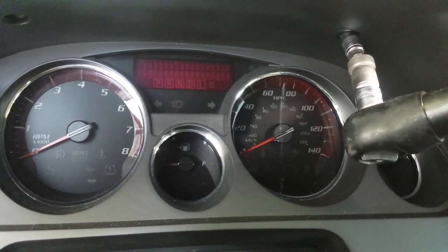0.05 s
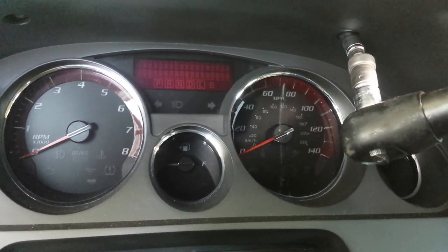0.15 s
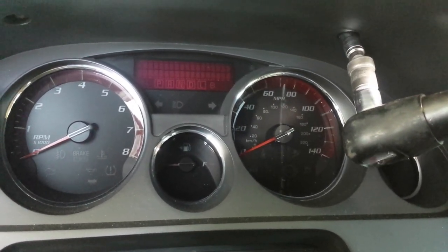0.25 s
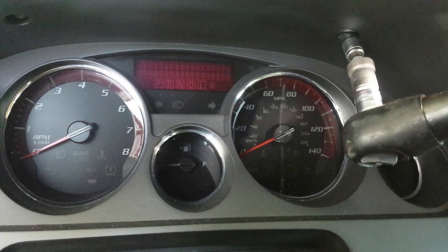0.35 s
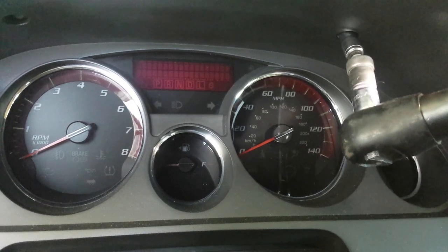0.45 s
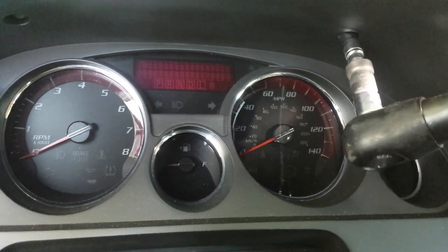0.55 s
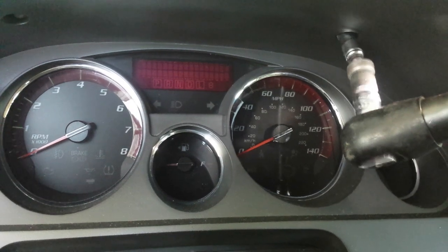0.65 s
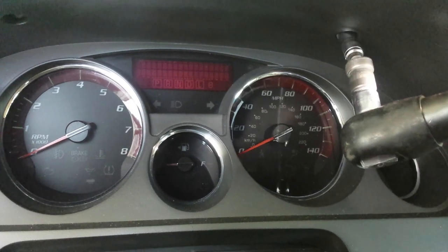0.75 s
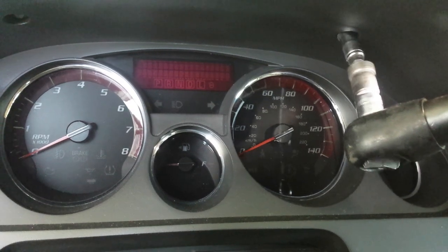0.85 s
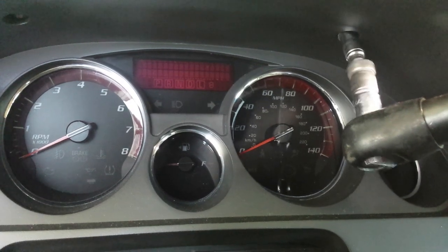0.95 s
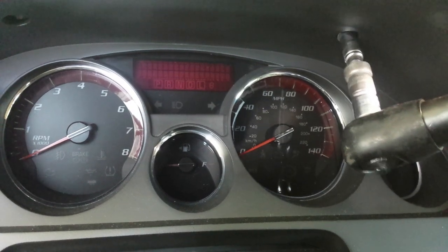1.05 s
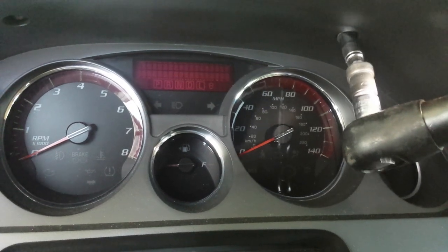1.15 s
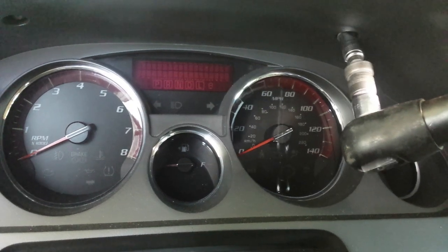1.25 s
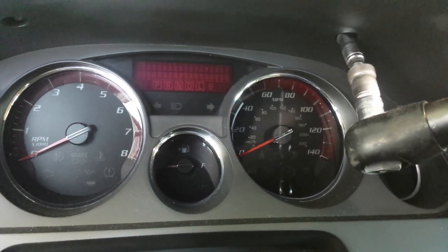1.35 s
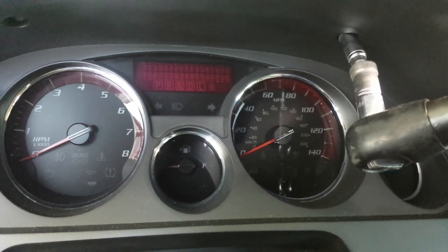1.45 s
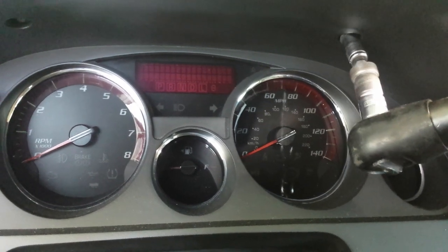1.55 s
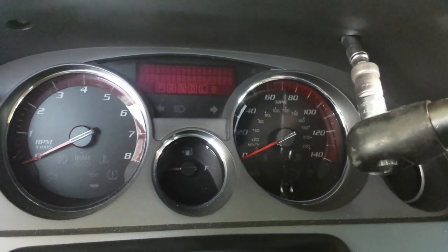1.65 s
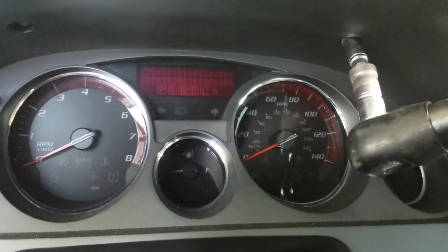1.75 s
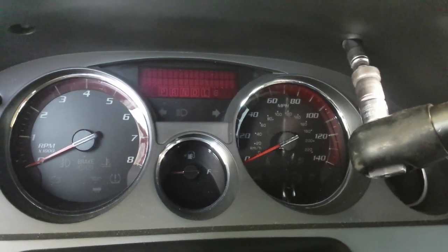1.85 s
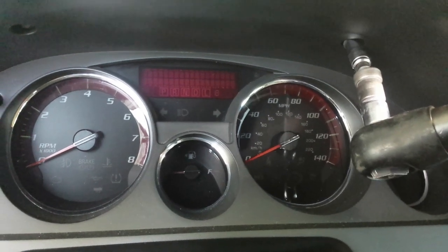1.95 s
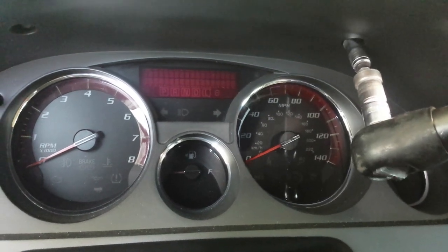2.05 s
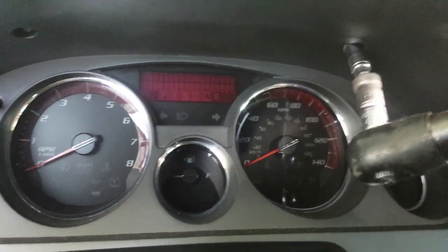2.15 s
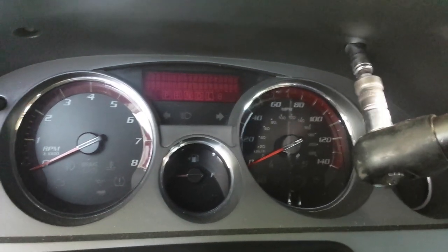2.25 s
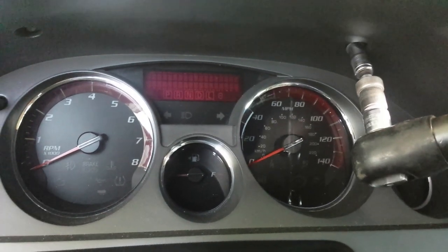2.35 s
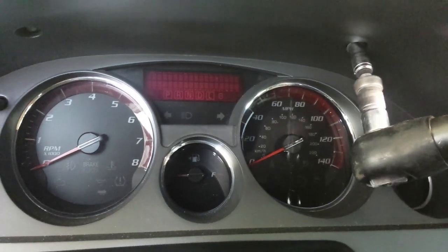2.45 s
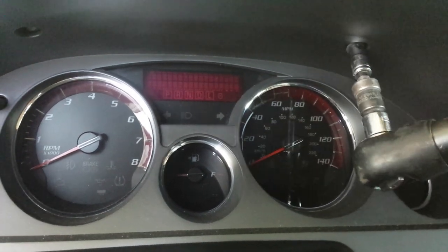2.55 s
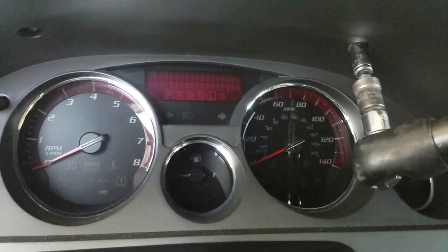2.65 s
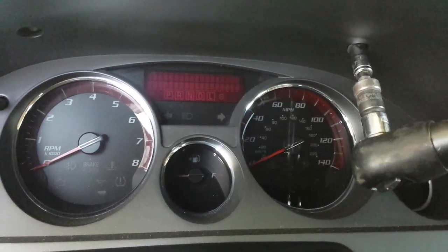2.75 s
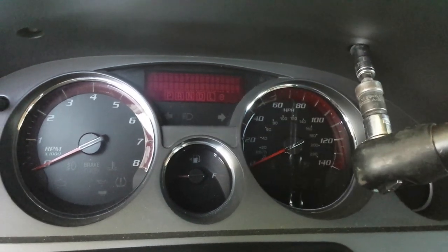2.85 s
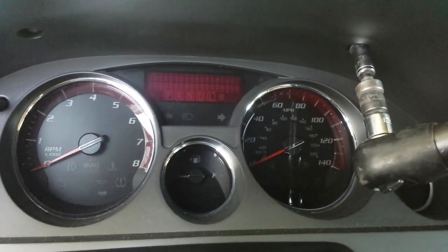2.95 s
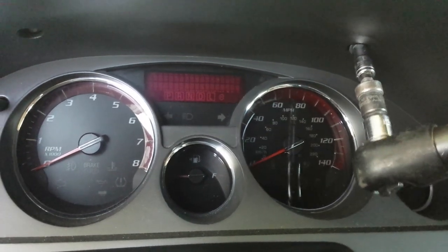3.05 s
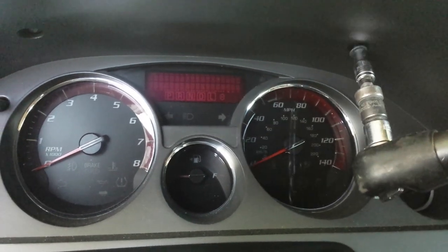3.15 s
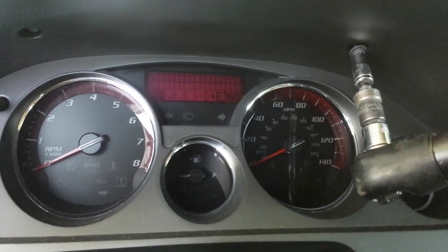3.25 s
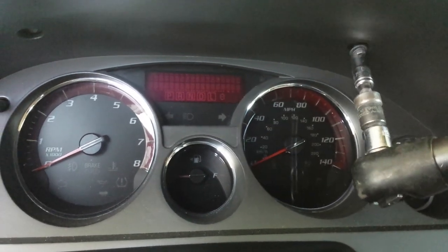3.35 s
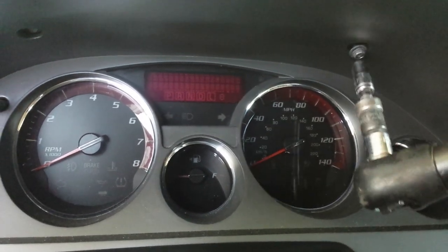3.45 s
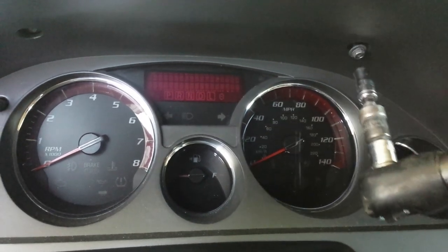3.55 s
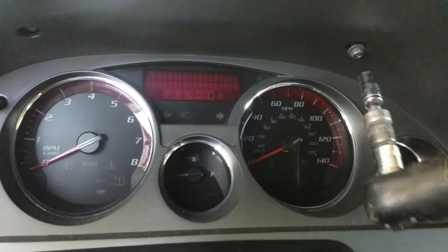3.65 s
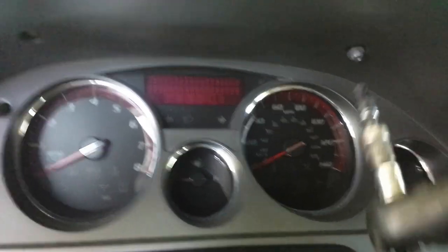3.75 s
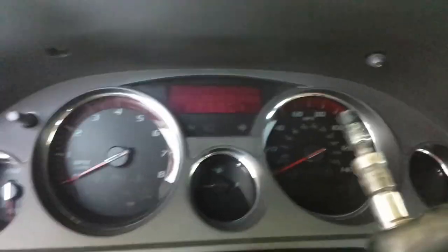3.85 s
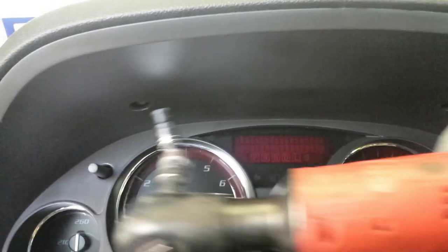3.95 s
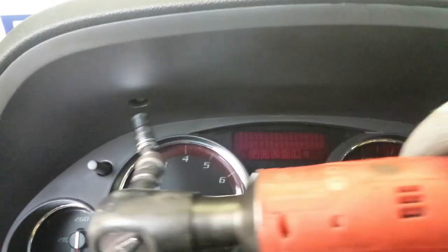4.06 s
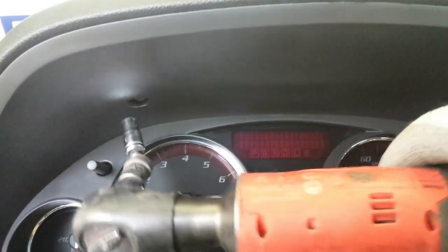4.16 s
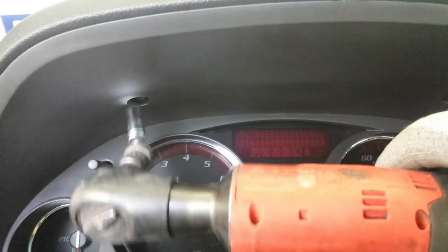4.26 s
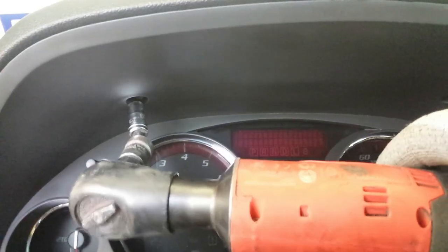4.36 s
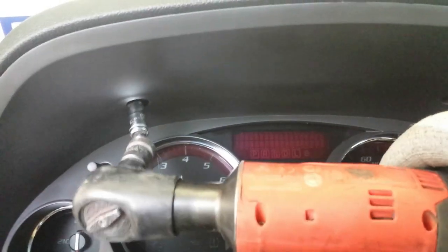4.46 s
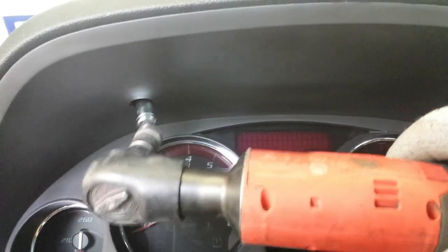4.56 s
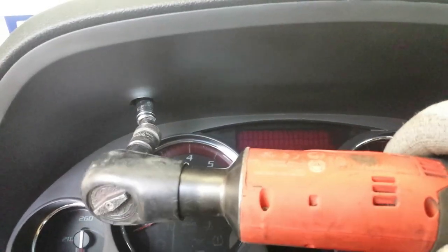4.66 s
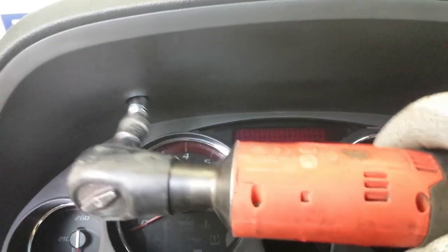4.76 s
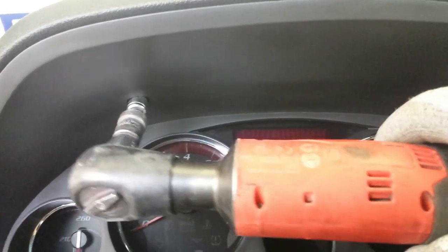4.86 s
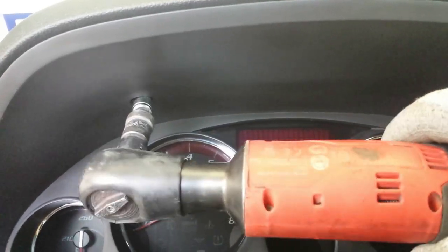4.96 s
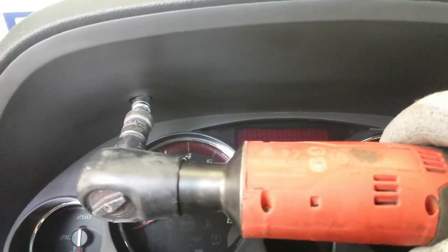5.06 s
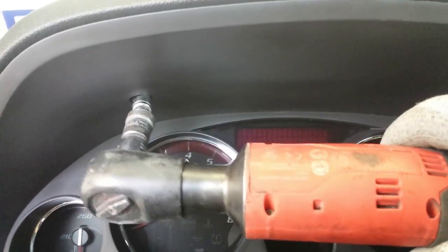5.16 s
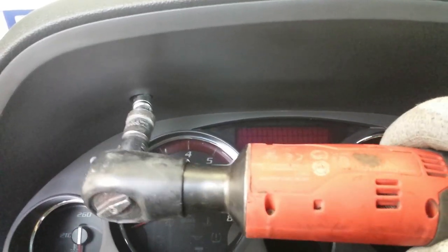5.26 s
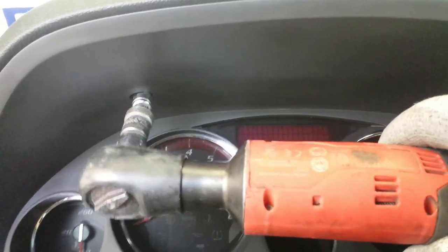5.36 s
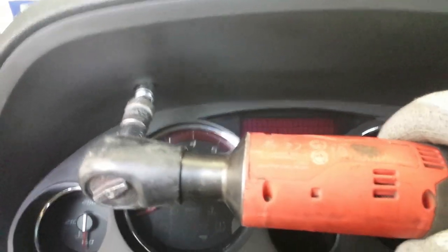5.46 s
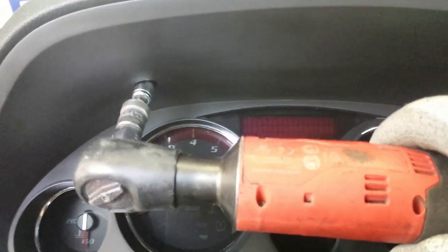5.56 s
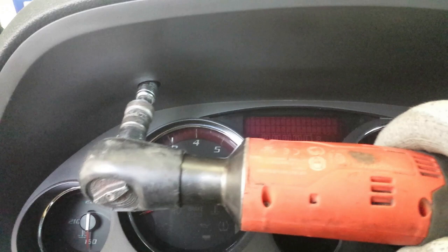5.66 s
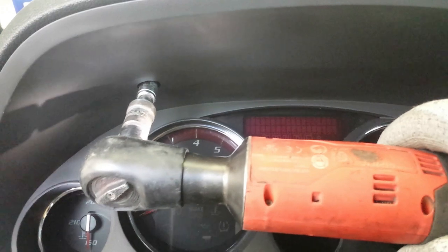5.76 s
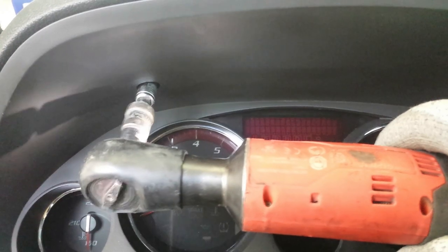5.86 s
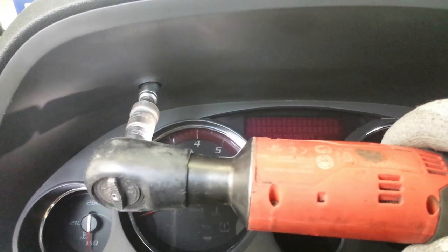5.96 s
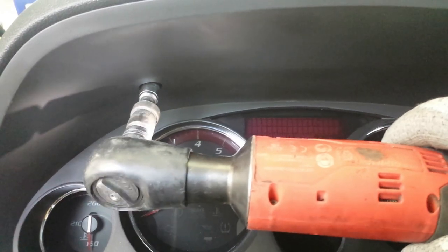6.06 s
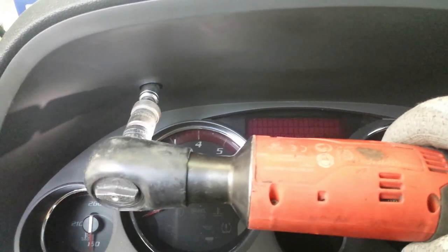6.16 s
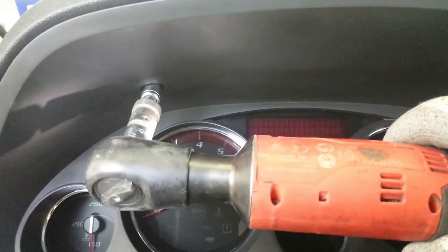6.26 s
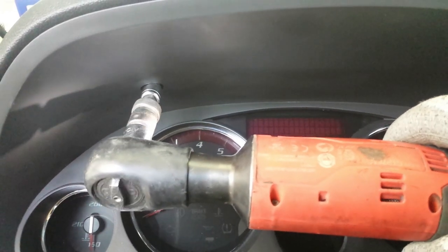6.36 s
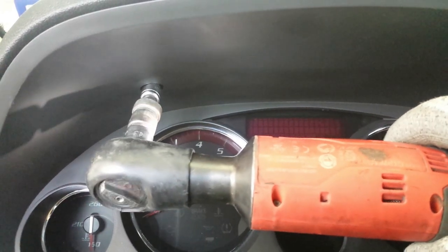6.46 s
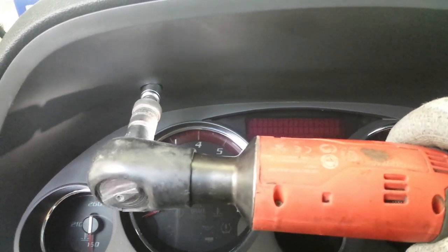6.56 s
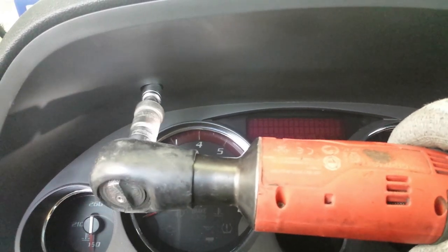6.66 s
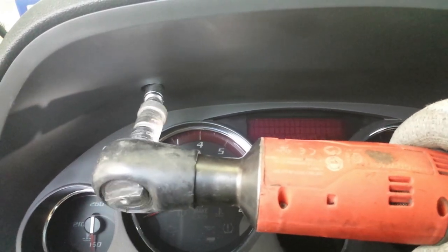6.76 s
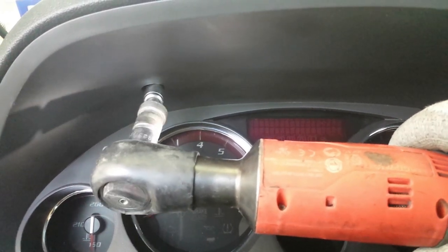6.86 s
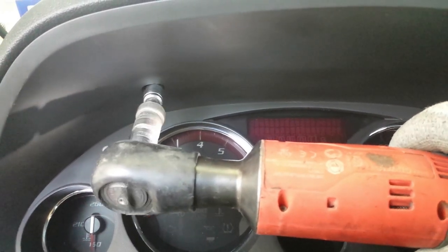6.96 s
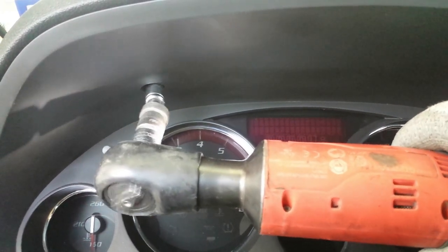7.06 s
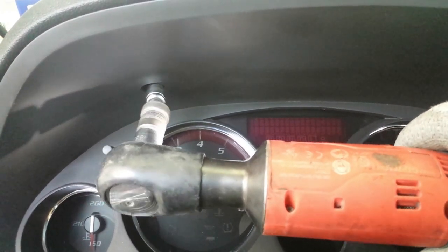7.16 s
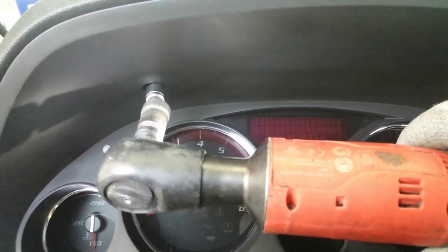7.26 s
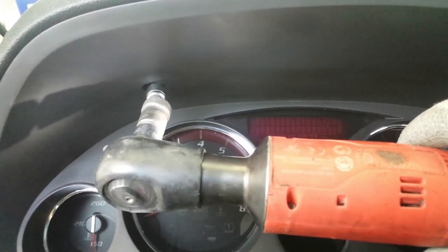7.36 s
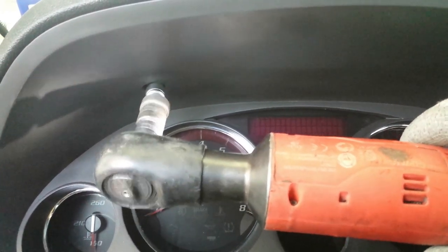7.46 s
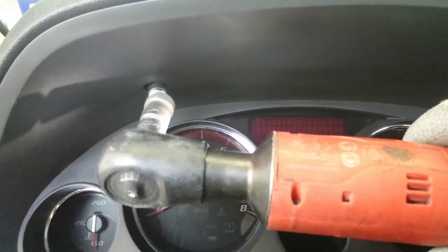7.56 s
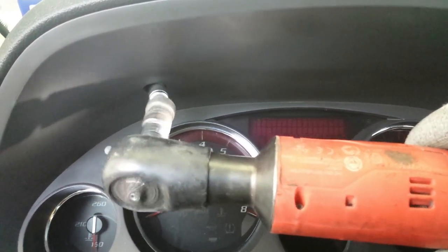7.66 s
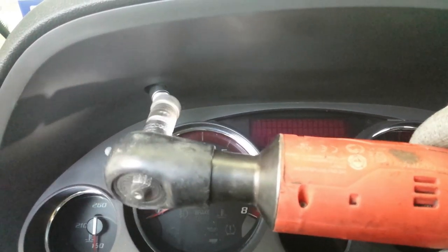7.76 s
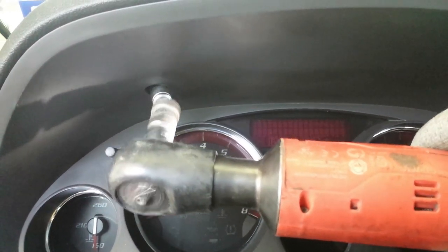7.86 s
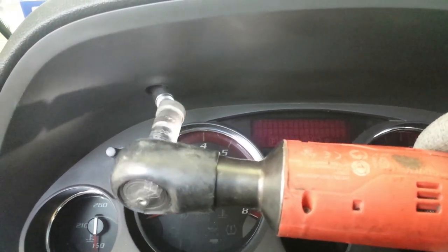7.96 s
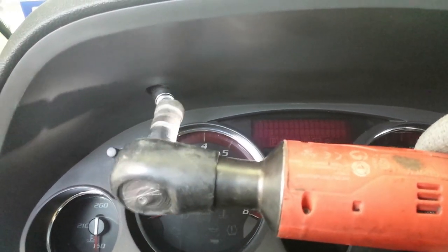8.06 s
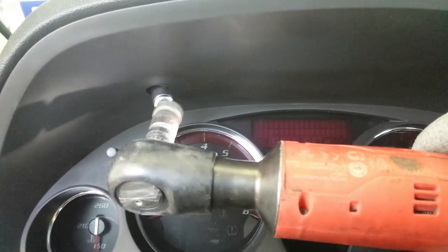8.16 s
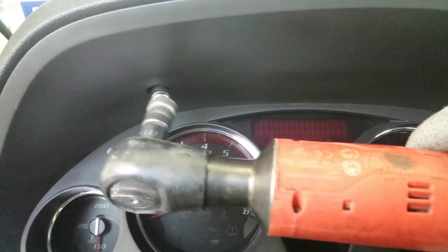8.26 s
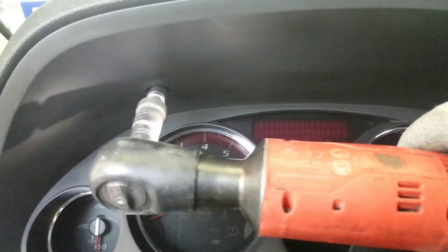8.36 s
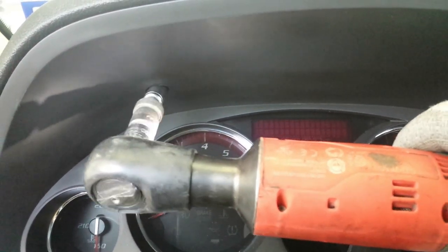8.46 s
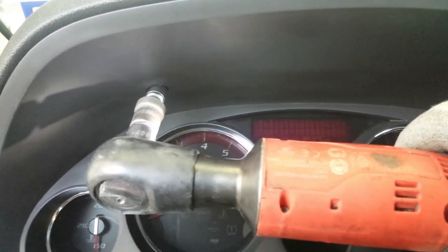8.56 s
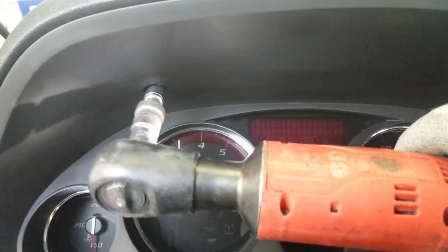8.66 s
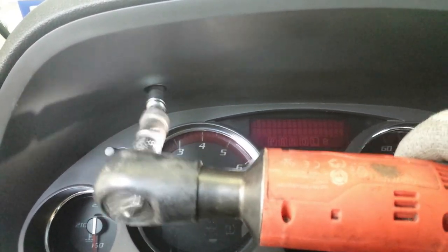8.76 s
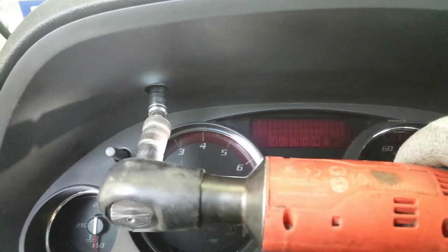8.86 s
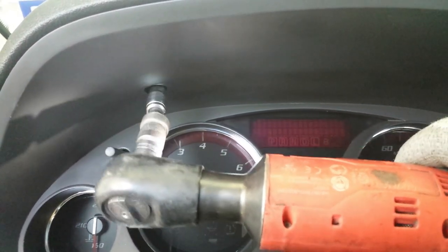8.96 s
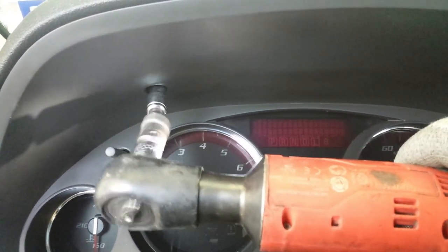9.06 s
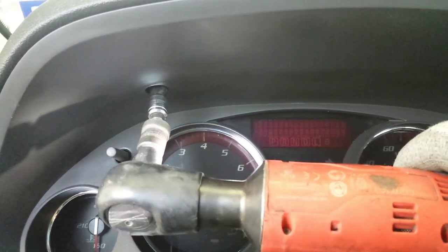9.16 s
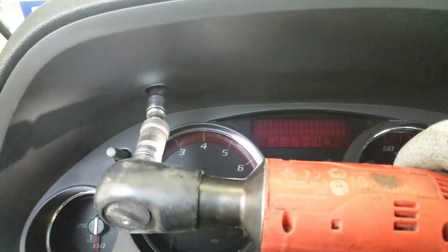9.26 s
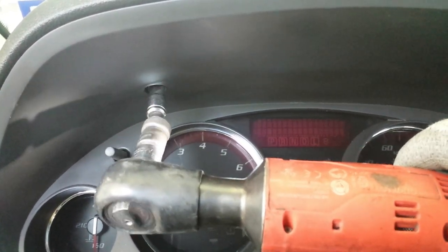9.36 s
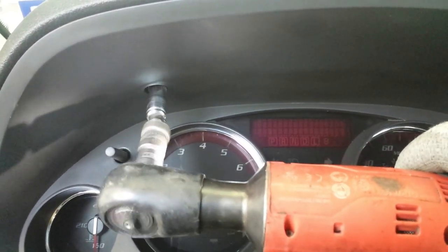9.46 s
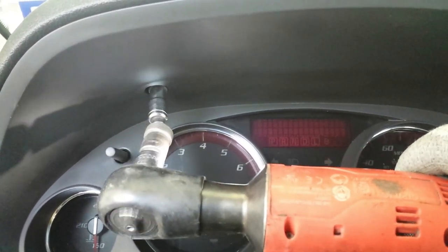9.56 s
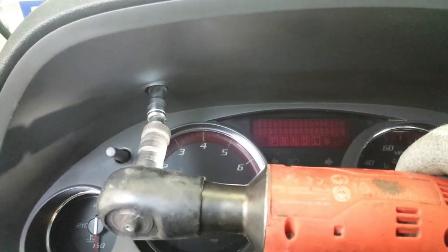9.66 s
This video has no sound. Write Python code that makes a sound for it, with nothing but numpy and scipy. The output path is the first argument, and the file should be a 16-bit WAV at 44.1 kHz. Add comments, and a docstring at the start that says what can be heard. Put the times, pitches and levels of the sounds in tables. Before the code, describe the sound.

From the start a cordless ratchet runs very close, a dense metallic whir of pawl clacks, gear rattle and low buzz, rising slightly in speed by 0.8 s and holding steady, with soft air thumps on the right. At about 2.7 s it coasts down in a few clacks and stops. Quiet cabin rumble and hiss remain, with faint steel ticks and squeaks until 3.4 s. Around 3.95 s handling rumble swells with a bright scrape and chirp; a soft pop and knock come near 4.4 s, strong socket clinks at 4.7 s, then scrapes, knocks and small ticks to 5.9 s. A thin whine flickers at 5.9 s and the ratchet strains in separate rapid clacks from 6 s, blurring into a whir near 6.9 s. It is fastest around 8 s, sags at 8.55 s, recovers and surges again by 9.7 s. Dry, padded small space.

```python
"""A cordless ratchet backs two screws out of a dashboard hood, close to the right microphone port.
Every crank turn the pawl clacks over the teeth in a fixed pattern: filtered noise bursts that ring the head.
Meshing gears rattle as random noise grains, the crank buzzes once a turn, fan eddies slap the right port.
Between the screws decaying modes make the socket's steel ring and the hood's knocks, among scrapes and squeaks.
Rumble, air, hiss and hums of a quiet cabin lie beneath; a short diffuse tail surrounds tool and touches."""
import sys
import numpy as np
from scipy import signal
from scipy.fft import rfft, irfft
from scipy.io import wavfile
from scipy.ndimage import uniform_filter1d

SR = 44100
rng = np.random.default_rng(int(sys.argv[2]) if len(sys.argv) > 2 else 0)


def pcm_store(signal):
    """Save signal as 16-bit PCM."""
    levels = np.round(np.clip(np.atleast_2d(signal), -1, 1) * 32767)
    wavfile.write(sys.argv[1], SR, levels.astype(np.int16).T)


N = 428211

# crank speed while each screw turns: time_s, speed (turns per s)
FIRST_SPEED = [(0, 67.69), (0.45, 68.75), (0.8, 84.91), (1.2, 86.89), (1.8, 86.23), (2.1, 85.29),
               (2.55, 85.84), (2.76, 77.3)]
SECOND_SPEED = [(6, 10.08), (6.1, 22.19), (6.3, 25.19), (6.6, 28.34), (7.1, 76.65), (7.3, 81.81),
                (7.5, 84.22), (7.7, 98.41), (8.2, 99.95), (8.35, 92.08), (8.55, 61.82), (8.75, 71.92),
                (9, 74.23), (9.3, 72.09), (9.45, 77.84), (9.62, 97.76), (9.71, 99.32)]
# left port against right, one curve a screw: pitch_hz, balance_db
TOOL_BALANCE = [
    [(60, -11.5), (110, -8), (200, 5), (380, -8.5), (700, -3), (1290, -6), (2380, -6.5), (4400, -3.5),
     (8120, -15), (15000, -12.5)],
    [(60, -7), (110, -14), (200, -8.5), (380, -6.5), (700, -9.5), (1290, -7.5), (2380, -8), (4400, 0),
     (8120, -14.5), (15000, -15)],
]
TOOL_LIKENESS = 0.23   # of the tool's noise at the two ports, 0-1
USUAL_SPEED = 85   # turns per s
RELEASE_S = 2.7   # the first screw ends as the trigger is let go
SQUEEZED_S = 5.958   # the trigger reaches full gain for the second screw


def amp(db):
    """Decibels to linear gain."""
    return 10 ** (np.asarray(db) / 20)


def rms_one(x):
    """Scales a signal to rms 1."""
    return x / np.sqrt(np.mean(x ** 2) + 1e-20)


def mid_one(x):
    """Scales a pair so that its mean has rms 1."""
    return x / np.sqrt(np.mean(x.mean(axis=0) ** 2))


def in_time(rows, outside=None):
    """Columns of a curve table, sample by sample."""
    s, *columns = np.transpose(rows)
    return [np.interp(np.arange(N) / SR, s, c, outside, outside) for c in columns]


def impulses(rows):
    """A click for each (time_s, level_db) row."""
    s, db = np.transpose(rows)
    return np.bincount(np.round(s * SR).astype(int), amp(db), N)


def die(clicks, t60):
    """Each click becomes an exponential envelope, 60 dB down after t60 seconds."""
    return signal.lfilter([1], [1, -amp(-60 / (t60 * SR))], clicks + 1e-18)


def drift(rate):
    """Slow chance of rms 1: low-passed noise near a rate in Hz, drawn at every 16th sample."""
    r = np.exp(-32 * np.pi * rate / SR)
    noise = rng.standard_normal(N // 16 + 2002)
    slow = signal.lfilter([1], [1, -2 * r, r * r], noise)[2000:]
    return np.interp(np.arange(N) / 16, np.arange(len(slow)), rms_one(slow))


def pair(alike):
    """Two noises with a given likeness, from a shared middle and an opposed side."""
    mid, side = rng.standard_normal((2, N))
    alike = np.clip(alike, 0, 1)
    return np.sqrt(1 + alike) * mid + np.sqrt(1 - alike) * side * [[1], [-1]]


def colour(x, spectrum, lifts=(), tilt=None, share=0):
    """Causal (minimum-phase) filter from a spectrum, resonant lifts and a share of a left-right tilt."""
    hz = np.maximum(np.fft.rfftfreq(4096, 1 / SR), 1)

    def read(points):
        point_hz, point_db = np.array(points).T
        return np.interp(np.log(hz), np.log(point_hz), point_db)

    db = read(spectrum) + sum(lift / (1 + (2 * (hz - f) / w) ** 2) for f, w, lift in lifts)
    db = db + (share * read(tilt) if tilt else 0)
    # folding the cepstrum forward makes the filter causal
    cepstrum = irfft(db * np.log(10) / 20)
    cepstrum[1:2048] *= 2
    cepstrum[2049:] = 0
    return signal.oaconvolve(x, irfft(np.exp(rfft(cepstrum))))[:len(x)]


def at_ports(noise, spectrum, lifts, tilt):
    """The tool heard at both ports; the left one lies in the shadow."""
    left = colour(noise[0], spectrum, lifts, tilt, share=0.97)
    return np.array([left, colour(noise[1], spectrum, lifts)])


def flicker(x, patchy_db, rate, count=17):
    """Loose parts rattle on and off: bands 0.4 octave wide swell and sink on their own, the treble least."""
    out, edges = x.copy(), 130 * 2 ** (.4 * np.arange(count))
    for low, high in zip(edges, edges[1:]):
        band = signal.sosfilt(signal.butter(2, [low, high], "band", fs=SR, output="sos"), x)
        swell_db = patchy_db * (low / 1000) ** -.4 * drift(rate)
        out += (amp(swell_db) - 1) * band
    return out


def head(order):
    """Resonances of the ratchet head as one excitation meets them: 0 rattle and ticks, 1 driving, 2 returning."""
    # pitch_hz, width_hz, rattle_and_ticks_db, driving_clacks_db, returning_clacks_db (lifts)
    resonances = [(525, 76, 4.5, 0.5, 1), (704, 78, 5.5, 3, -1.5), (1240, 140, 5.5, 0.5, 2.5),
                  (3810, 110, 2.5, -1, 2), (4955, 150, 4, -1.5, 0.5), (5614, 95, 2, -3.5, 6.5),
                  (6360, 640, 2.5, 0.5, 7.5), (7255, 300, 3.5, 4.5, 5), (8100, 330, -1, 3.5, -7),
                  (8550, 170, 2.5, 6.5, -9), (8990, 370, -8.5, 6, -9), (10190, 460, -2, 6.5, -6.5),
                  (12000, 2200, 1, -3.5, -1)]
    return [(row[0], row[1], row[2 + order]) for row in resonances]


def trigger(k):
    """Gain in dB as the motor coasts down, then is braked (first screw), or is squeezed on (second)."""
    coast_db_per_s, brake_s, brake_db_per_s, rise_db_per_s = 214, 2.755, 1500, 900
    t = np.arange(N) / SR
    release = -coast_db_per_s * (t - RELEASE_S) - brake_db_per_s * np.maximum(t - brake_s, 0)
    squeeze = rise_db_per_s * (t - SQUEEZED_S)
    return np.clip([release, squeeze][k], -120, 0)


def pawl_envelope(turns, speed):
    """Every turn plays the contact table; each clack comes a little early or late, harder or softer."""
    # contacts in one crank turn: angle (turns), slow_db, fast_db, share that rings high (0-1)
    contacts = [(.05, -9.5, 1, 0), (.17, -7, -2, 0.04), (0.399, -18.5, -5.5, 0.4), (.552, -19, -3, 0.1),
                (.74, -6, 0.5, .9), (.84, -3.5, -6.5, 0.8), (0.941, -2.5, -6, 0.7)]
    # returning clacks over driving clacks: time_s, level_db
    return_curve = [(0, 2.5), (.6, -3), (2.7, -1.5), (6.7, -0.5), (7.2, -2), (8, 0), (8.6, -4.5), (9, 1),
                    (9.7, 3.5)]
    slow_speed, fast_speed = 10, 93   # turns per s
    t60_s, spread_db, jitter_turns = 0.013, 1.5, 0.027
    angle, slow_db, fast_db, high = np.transpose(contacts)
    whole = np.arange(0, turns[-1])[:, None]
    luck = rng.standard_normal((len(whole), 2, len(angle)))
    at = np.searchsorted(turns, whole + angle + jitter_turns * luck[:, 0])
    fast = np.clip((speed[np.minimum(at, N - 1)] - slow_speed) / (fast_speed - slow_speed), 0, 1)
    size = amp(slow_db + fast * (fast_db - slow_db) + spread_db * luck[:, 1])
    inside = (at > 0) & (at < N)
    high = np.clip(high, 0, 1)
    lean = in_time(return_curve)[0] / 2
    clicks = [np.bincount(at[inside], (size * np.sqrt(share))[inside], N) for share in (high, 1 - high)]
    envelope = die(uniform_filter1d(clicks, size=30), t60_s) * amp([-lean, lean])   # driving, returning
    # local power is levelled, so that effort alone sets the loudness
    power = uniform_filter1d(np.sum(envelope ** 2, axis=0), size=SR // 8)
    return envelope / np.sqrt(power + 1e-7)


def ratchet(k, speed_rows):
    """One screw: pawl clacks, gear rattle and crank buzz, all louder with speed."""
    # crank angle as each speed table begins (turns)
    start_turns = [.31, .91]
    # colours of clacks, rattle and the crank's push through head and hood, by screw: pitch_hz, gain_db
    pawl_colour = [
        [(880, -38.5), (1500, -20), (2450, -21.5), (2700, -15.5), (3150, -20.5), (5000, -7), (5840, -9.5),
         (8100, 3), (9090, -6), (10400, -3.5), (11500, -13.5), (13100, -15.5), (15000, -36.5)],
        [(880, -51.5), (1500, -16), (2080, -26.5), (2310, -10.5), (2700, -32.5), (2970, -12), (3400, -21),
         (5450, -5.5), (5950, -9.5), (7210, -1.5), (8330, 1.5), (13900, -17.5), (14500, -25), (15000, -38)],
    ]
    gears_colour = [
        [(180, -54), (300, -30.5), (383, -23.5), (691, -22.5), (830, -19.5), (930, -26.5), (1030, -15.5),
         (1250, -16.5), (2250, -14), (2480, -21.5), (2730, -14), (8190, -7.5), (13200, -21), (13800, -26),
         (15000, -72.5)],
        [(180, -41.5), (300, -13), (383, -17), (587, -12), (913, -11.5), (1270, -10), (1760, -10),
         (2320, -11.5), (2560, -10), (8320, -4), (13200, -32), (14300, -26), (15000, -32)],
    ]
    buzz_colour = [
        [(60, -33.5), (100, -17.5), (180, 4), (260, 2.5), (400, -11.5), (650, 9), (900, -15.5), (1300, -7),
         (2200, -6.5), (3500, -26.5)],
        [(60, -11), (100, -37), (180, -5), (260, -9.5), (400, -13.5), (650, 5.5), (900, 4.5), (1300, -4.5),
         (2200, -11), (3500, -23)],
    ]
    # level laws, one row a screw: relative level_db at the usual speed, slope (dB per turn per s)
    pawl_law = [(-17, 0.1), (-16, 0.1033)]
    gears_law = [(-24, 0.21), (-23.5, 0.17)]
    buzz_law = [(-34, 0.38), (-39, 0.064)]
    # left port after right, by screw: lag_s
    port_lag = [-.00023, 0.0]
    blur_s = 6.87   # single strokes of the second screw run together from here
    lurch_db, lurch_s = 8.5, 0.1   # the gears strain as the second screw breaks loose
    mesh_per_s, mesh_spread_db = 4000, 1.5   # gear teeth meeting

    speed, = in_time(speed_rows, outside=0)
    turns = start_turns[k] + np.cumsum(speed) / SR
    t = np.arange(N) / SR
    excess = in_time(speed_rows)[0] - USUAL_SPEED
    pawl_db, gears_db, buzz_db = [law[k][0] + law[k][1] * excess + trigger(k)
                                  for law in (pawl_law, gears_law, buzz_law)]

    blurred = (t > blur_s) if k else (t < RELEASE_S)
    clacks = sum(at_ports(envelope * pair(TOOL_LIKENESS), pawl_colour[k], head(order=j + 1), TOOL_BALANCE[k])
                 for j, envelope in enumerate(pawl_envelope(turns, speed)))
    pawl = blurred * amp(pawl_db - 4.0) * mid_one(clacks)

    # teeth chatter, harder on the drive stroke
    gears_db = gears_db + k * lurch_db * np.exp(-np.maximum(t - SQUEEZED_S, 0) / lurch_s)
    meet = rng.random(N) < mesh_per_s / SR
    chance_db = mesh_spread_db * np.minimum(rng.exponential(1, N), 4) + 0.45 * drift(170)
    rattle = meet * amp(chance_db + 0.3 * np.cos(2 * np.pi * turns))
    rattle = at_ports(rattle * pair(TOOL_LIKENESS), gears_colour[k], head(order=0), TOOL_BALANCE[k])
    gears = amp(gears_db) * mid_one(rattle)

    # one push a turn, levelled; its lines break up and waver
    pushes = np.diff(np.floor(turns + 0.013 * drift(25)), prepend=0) * amp(0.97 * drift(40))
    buzz = colour(pushes, buzz_colour[k])
    buzz = amp(buzz_db - 7.5) * buzz / np.sqrt(uniform_filter1d(buzz ** 2, size=SR // 8) + 1e-12)
    buzz = flicker(buzz, 2.5, 6.0, count=8)

    left, right = pawl + gears + buzz * amp([[-1.5], [1.5]])
    return np.array([np.roll(left, round(port_lag[k] * SR)), right])


def room(x):
    """Short diffuse tail of a padded cabin: decaying noise, own echoes for each port."""
    t60_s = 0.22
    since = np.arange(int(.5 * SR)) / SR
    echoes = rng.standard_normal((2, len(since))) * amp(-60 * since / t60_s) * (since > .004)
    echoes = echoes / np.sqrt(np.sum(echoes ** 2, axis=1, keepdims=True))
    return signal.oaconvolve(x, echoes, axes=1)[:, :N]


def cabin():
    """Low rumble, hums, air and hiss; rumble, hums and hiss change when the microphone is moved."""
    # relative levels, swelling while the hands move: time_s, rumble_db, air_db
    swells = [(2.78, -58, -56), (2.9, -51, -70.5), (3.4, -60, -71.5), (3.75, -55, -68), (3.97, -41, -54.5),
              (4.15, -45, -53), (4.65, -41.5, -49), (4.9, -43, -40), (5.12, -49, -57.5), (5.4, -56, -57),
              (5.85, -46.5, -55.5), (6.05, -60, -41.5)]
    # rumble colours before and after the move: pitch_hz, gain_db
    rumble_colours = [
        [(15, -65), (25, -39), (48, -23.5), (60, -7.5), (76, 4.5), (93, -0.5), (108, -34), (180, -34.5),
         (230, -65), (400, -120)],
        [(15, -31), (25, -10), (70, 5), (99, 5), (139, -12), (180, -2), (230, -66), (400, -120)],
    ]
    # air and hiss colours: pitch_hz, gain_db
    air_colour = [(71, -33), (120, -8.5), (194, -6), (241, -9), (300, -15.5), (531, -15.5), (595, -15),
                  (1120, -14.5), (2500, -47.5), (3250, -65), (5500, -120)]
    hiss_colour = [(940, -25), (1600, 0.5), (1770, -4), (3230, -6), (3790, -5.5), (5500, -7.5), (7030, -6),
                   (7640, -2.5), (7940, -6.5), (13900, -16), (15000, -11)]
    # resonance of the air: pitch_hz, width_hz, lift_db
    air_ring = [(513, 33, 6)]
    # steady hums: pitch_hz, before_db, after_db
    hums = [(48, -80, -56), (80, -56, -55), (100, -80, -60), (188, -80, -62)]
    # thin steady whines: pitch_hz, level_db over the hiss
    whines = [(7472, -12.5), (8695, -19.5), (13655, -27)]
    move_s, move_length_s = 3.9, 0.065
    # hiss level at air of -54 dB, share of the air's swing it follows, gain after the move
    hiss_base_db, hiss_follows, hiss_moved_db = -65.5, 0.48, 7

    rumble_db, air_db = in_time(swells)
    moved = np.clip((np.arange(N) / SR - move_s) / move_length_s, 0, 1)
    hiss_db = hiss_base_db + hiss_follows * (air_db + 54.0) + hiss_moved_db * moved

    def noise(sides, *shape):
        return rms_one(np.array([colour(side, *shape) for side in sides]))

    def tone(hz):
        return np.sin(2 * np.pi * hz * np.arange(N) / SR) * amp(1.484 * drift(3))

    low = pair(0.47)
    before, after = [noise(low, spectrum) for spectrum in rumble_colours]
    rumble = amp(rumble_db - 3) * ((1 - moved) * before + moved * after)
    rumble = rumble + sum(amp(db + moved * (moved_db - db)) * tone(hz) for hz, db, moved_db in hums)
    air = amp(air_db + 0.5 * drift(9)) * noise(pair(0.2), air_colour, air_ring)
    hiss = noise(pair(0), hiss_colour) + sum(amp(db) * tone(hz) for hz, db in whines)
    return (rumble + air) * amp([[-1.5], [1.2]]) + amp(hiss_db) * hiss * amp([[-4], [2]])


def slaps():
    """A push of air and its rebound, almost only on the right; weaker ones come at random, more with speed."""
    # the strongest fan eddies that slap the right port: time_s, level_db (relative)
    strong = [(0.068, -14), (0.573, -16), (0.715, -22), (0.849, -17), (0.895, -15), (0.975, -18),
              (1.021, -14.5), (1.163, -10), (1.568, -9.5), (1.633, -14), (2.357, -10), (2.602, -15),
              (2.699, -10), (7.271, -11.5), (7.535, -12.5), (7.646, -8.5), (7.765, -7), (7.799, -5),
              (7.87, -7.5), (7.969, -9), (8.032, -3), (8.294, -9), (8.381, -10.5), (8.43, -10.5),
              (8.525, -14.5), (8.695, -20.5), (9.062, -11), (9.17, -31), (9.28, -13.5), (9.38, -19.5),
              (9.5, -14), (9.53, -16), (9.675, -10)]
    eddies_per_s, eddy_db = 16, -22   # at the usual speed, level relative
    rate_growth, db_per_turn = 0.04, 0.36   # exponent of the rate and dB, each per turn per s
    spread_db = 3.5
    speed = in_time(FIRST_SPEED, outside=0)[0] + in_time(SECOND_SPEED, outside=0)[0]
    excess = speed - USUAL_SPEED
    born = rng.random(N) < (speed > 0) * eddies_per_s * np.exp(rate_growth * excess) / SR
    weak = born * amp(eddy_db + db_per_turn * excess + spread_db * rng.standard_normal(N))
    push = uniform_filter1d(impulses(strong) + weak, size=36)
    smooth = signal.sosfilt(signal.butter(1, 200, fs=SR, output="sos"), push)
    rebound = signal.sosfilt(signal.butter(2, 62, "high", fs=SR, output="sos"), smooth)
    return amp(36.0) * rebound * amp([[-17], [0]])


def slow_clacks():
    """At a crawl every pawl tooth is heard alone; the first ring the head high, the last lower."""
    # crank strokes while the second screw breaks loose: time_s, level_db (relative)
    strokes = [(6.0084, 1), (6.065, -2.5), (6.1131, -3), (6.158, -3), (6.2005, -3.5), (6.2416, -6),
               (6.2812, -2.5), (6.32, -5), (6.3591, -5), (6.3976, -6), (6.4359, -4.5), (6.4738, -3.5),
               (6.5115, -6), (6.548, -5.5), (6.5852, -4), (6.62, -4.5), (6.651, -6.5), (6.6794, -10),
               (6.7073, -3), (6.7312, -6), (6.7531, -7.5), (6.7766, -2), (6.798, -6), (6.819, -9),
               (6.8389, -5), (6.8582, -7)]
    # teeth passed in each stroke: angle (turns), level_db, spread_db, share that rings high (0-1)
    tooth_rows = [(-.17, -8.5, 5, 0.7), (0, 5, 2.4, 0.92), (0.159, 3, 2.8, 0.83), (.37, 2, 3, 0.15),
                  (.56, -14.5, 9.5, 0.05)]
    # the last teeth passed as the motor coasts after the first screw: time_s, level_db (relative)
    last_teeth = [(2.7005, -1), (2.705, -1), (2.7215, -2), (2.7275, -2.5), (2.742, -15), (2.75, -12)]
    # colour of the single clacks: pitch_hz, gain_db
    clack_colour = [(880, -38), (1500, -10.5), (1780, -23), (1950, -11), (2120, -18.5), (3470, -14),
                    (3750, -16.5), (5350, -6), (6060, -6.5), (8830, 1.5), (9630, -4), (13900, -19.5),
                    (15000, -30)]
    # high ringing of the head: pitch_hz, width_hz, lift_db
    high_ring = [(3700, 300, -3), (7500, 290, 8.5), (8600, 300, 8.5), (9000, 270, 7), (10140, 270, 8)]
    t60_s = .014

    s, db = np.transpose(strokes)
    angle, tooth_db, spread_db, high = np.transpose(tooth_rows)
    luck = rng.standard_normal((len(s), len(angle)))
    high, out = np.clip(high, .01, .99), 0
    tooth_s = s[:, None] + np.gradient(s)[:, None] * angle   # stroke spacing gives the turn's length
    for share, lifts in ((high, high_ring), (1 - high, head(order=2))):
        level_db = db[:, None] + tooth_db + spread_db * luck + 10 * np.log10(share)
        teeth = np.transpose([tooth_s.ravel(), level_db.ravel()])
        clicks = impulses(teeth) + np.sqrt(share.mean()) * impulses(last_teeth)
        envelope = die(uniform_filter1d(clicks, size=16) * 0.54, t60_s)
        out = out + at_ports(envelope * pair(TOOL_LIKENESS), clack_colour, lifts, TOOL_BALANCE[1])
    return amp(-1.5) * out / np.std(colour(rng.standard_normal(SR), clack_colour, high_ring))


def squeaks():
    """Faint wavering squeaks: gliding sines whose pitch and level drift."""
    # start_s, length_s, first_hz, last_hz, level_db (relative)
    chirps = [(2.87, 0.13, 3350, 3700, -76), (2.938, 0.05, 4500, 4400, -72), (3.29, .14, 5200, 5200, -77),
              (3.275, .025, 4400, 4500, -76), (3.35, .045, 3600, 4400, -78), (2.97, .12, 4050, 3800, -78),
              (3.385, .075, 3900, 4000, -81), (3.951, 0.032, 4200, 4160, -57),
              (4.945, .03, 1150, 1020, -42)]
    t, out, waver = np.arange(N) / SR, np.zeros(N), drift(60)
    for s, length, first_hz, last_hz, db in chirps:
        along = np.clip((t - s) / length, 0, 1)
        glide = np.cumsum(first_hz + (last_hz - first_hz) * along + 120 * drift(110)) / SR
        out += amp(db + 5 + 4.4 * waver) * np.sin(np.pi * along) * np.sin(2 * np.pi * glide)
    return out


def touches():
    """Steel ticks and the socket's ring, the hood's modes struck anew each time, gritty scrapes and a pop."""
    # socket on screw and trim: time_s, tick_db, knock_db (relative), brightness (dB per octave about 500 Hz)
    contact_rows = [(2.989, -42, -65, 7), (3.108, -63, -70, 4), (3.1596, -50, -60, 2), (3.178, -55, -60, 3),
                    (3.185, -52, -54, 2), (3.229, -51, -68, 9), (3.3133, -48, -59, 11.5),
                    (3.3332, -42.5, -65, 5), (4.4627, -28.5, -20.5, -1.5), (4.7096, -6, -25.5, -3),
                    (4.7213, -36, -36, 8), (4.7379, -9, -29, -1), (4.7518, -20, -24, 3),
                    (4.801, -31, -33, 0), (4.824, -31.5, -35, -1), (4.8574, -35, -36.5, 1),
                    (4.974, -12.5, -25, 8), (4.984, -24, -27, 1), (5.0427, -43, -48, -4),
                    (5.0724, -41, -50, -3), (5.106, -33.5, -52, 0), (5.1545, -41, -47.5, -1.5),
                    (5.3165, -34, -53, -1), (5.3666, -47, -60, 0), (5.524, -34, -55, 2),
                    (5.651, -39, -43.5, 1), (5.701, -37, -39, 0), (5.743, -35.5, -49, 1),
                    (5.7606, -45, -52, 1), (5.9, -30.5, -56, -2), (5.9126, -47, -38.5, 5.5),
                    (6.0348, -13.5, -26.5, 1)]
    # colour of the tick's noise: pitch_hz, gain_db
    tick_colour = [(710, -12), (1200, -12), (1850, -8), (2200, -5), (3060, -15), (3910, -6), (4960, -12),
                   (6820, -3), (8120, -10), (8910, -12), (10400, -21), (13200, -44), (14000, -34)]
    # modes of the plastic hood: pitch_hz, level_db, t60_s
    hood_modes = [(101, -13, 0.14), (198, 0, 0.12), (249, -3.5, 0.092), (290, -10, 0.15),
                  (416, -6.5, 0.067), (539, -1.5, 0.079), (690, -2, 0.053), (860, -5.5, 0.05),
                  (1064, -8, 0.046), (1236, -5, 0.05), (1530, -14, 0.053), (1650, -9, 0.049),
                  (1970, -16, 0.041)]
    # modes of the steel socket and extension: pitch_hz, level_db, t60_s
    socket_modes = [(2170, -9, 0.066), (2690, -15.5, 0.06), (3070, -12, 0.037), (3540, -9.5, 0.048),
                    (4080, -4.5, 0.037), (4600, -6.5, 0.036), (5000, -6, .04), (5400, -7.5, .035),
                    (5950, -7, 0.036), (6680, -1.5, 0.022), (6970, -3, 0.023), (7350, -9, 0.025),
                    (8030, -5, 0.027), (8740, -16, .03)]
    # glove and socket dragging on the hood: start_s, length_s, bright_db, dull_db (relative)
    scrapes = [(3.96, 0.09, -53.5, -61), (4.626, 0.04, -61.5, -50), (4.861, 0.055, -45, -39.5),
               (4.905, 0.11, -49, -52), (4.97, 0.057, -65, -40), (5.657, 0.085, -59, -45),
               (5.745, 0.043, -65, -44)]
    tick_t60_s, tick_pan_db = 0.047, -8.5   # left over right
    socket_db, socket_spread_db = -8, 7.5   # ring against the tick; random loss from touch to touch
    pop_s, pop_db, pop_t60_s = 4.4115, -25, .01   # a single soft pop

    tick, knock, ring, drag, swish = np.zeros((2, N)), np.zeros(N), np.zeros(N), np.zeros(N), np.zeros(N)
    luck = rng.normal(0, 1, (len(contact_rows), len(hood_modes) + len(socket_modes)))
    since = np.arange(SR // 5) / SR
    plastic_rise = 1 - np.exp(-since / 0.0012)   # plastic yields softly
    steel_rise = 1 - np.exp(-since / .0005)
    pan = np.array([[.5], [-.5]]) * tick_pan_db

    def mode(hz, db, t60, z):
        return amp(db - 60 * since / t60) * np.sin(2 * np.pi * hz * since) * np.sign(z)

    for (s, tick_db, knock_db, bright_db), strengths in zip(contact_rows, luck):
        at = slice(round(s * SR), round(s * SR) + len(since))
        tick[:, at] += amp(tick_db - 9 + pan - 60 * since / tick_t60_s) * steel_rise
        for (hz, db, t60), z in zip(hood_modes, strengths):
            mode_db = knock_db + db + bright_db * np.log2(hz / 500) + 2 * z
            knock[at] += mode(hz, mode_db, t60, z) * plastic_rise
        for (hz, db, t60), z in zip(socket_modes, strengths[len(hood_modes):]):
            ring[at] += mode(hz, tick_db + socket_db + db - socket_spread_db * abs(z), t60, z)

    grit = amp(4.1 * drift(120))
    for s, length, bright_db, dull_db in scrapes:
        stroke = np.sin(np.pi * np.clip((np.arange(N) / SR - s) / length, 0, 1)) * grit
        swish += amp(bright_db) * stroke
        drag += amp(dull_db) * stroke
    dull, bright = [rms_one(signal.sosfilt(signal.butter(2, hz, "band", fs=SR, output="sos"), pair(0.45)))
                    for hz in ([250, 1460], [4300, 7400])]
    # the bright scrape also rings the socket's modes
    flat, socket_lifts = [(1, 0), (SR, 0)], [(hz, 90, 7.0) for hz, db, t60 in socket_modes]
    bright = rms_one(np.array([colour(side, flat, socket_lifts) for side in bright]))

    scale = np.std(colour(rng.standard_normal(SR), tick_colour, head(order=0)))
    steel = [colour(side, tick_colour, head(order=0)) / scale for side in tick * pair(0.074)]
    steel = steel + ring * amp(pan) + swish * bright * amp([[-3], [3]])
    pop = uniform_filter1d(die(impulses([(pop_s, pop_db)]), pop_t60_s), size=8)
    return steel + (knock + drag * dull + pop) * amp([[-1.5], [1]])


def whine():
    """A thin chopper tone parts into two as the rotor gathers speed: a quickening beat, strongest on the right."""
    pitch_hz, level_db = 7870, -25   # level ahead of the port gains
    start_s, attack_s, fade_s, fade_length_s = 5.9, .03, 5.972, .035
    still_s, split = 5.93, 3600   # tones coincide at still_s; each then moves off (Hz per s)
    t = np.arange(N) / SR
    shape = np.clip(np.minimum((t - start_s) / attack_s, 1 - (t - fade_s) / fade_length_s), 0, 1)
    beat = np.cos(np.pi * split * (t - still_s) ** 2)
    return amp(level_db) * shape * beat * np.sin(2 * np.pi * pitch_hz * t) * amp([[-9], [4]])


def scene():
    """Tool and touches with their room tail, and air slaps, cabin and squeaks without it."""
    room_db = -19.5
    tool = flicker(ratchet(0, FIRST_SPEED) + ratchet(1, SECOND_SPEED), patchy_db=2.5, rate=10.5)
    near = tool + slow_clacks() + whine() + touches()
    return near + amp(room_db) * room(near) + slaps() + cabin() + squeaks()


def record(dry):
    """Peaks flatten near full scale, the top is cut."""
    cutoff_hz = 15700
    rounded = dry / (1 + np.abs(dry / .9) ** 6) ** (1 / 6)
    return signal.sosfilt(signal.cheby2(12, 70, cutoff_hz, fs=SR, output="sos"), rounded)


dry = scene()
out = record(dry)
pcm_store(out)
```